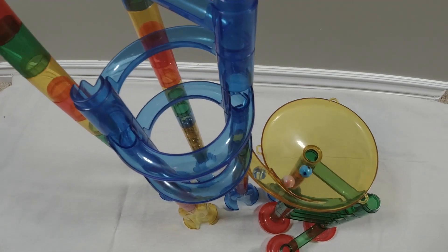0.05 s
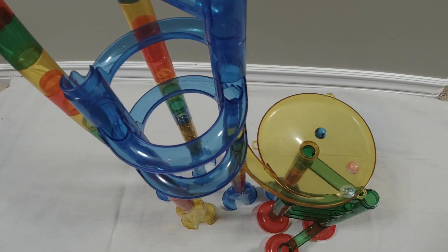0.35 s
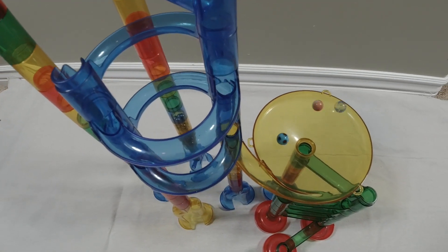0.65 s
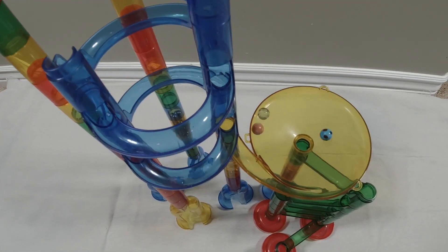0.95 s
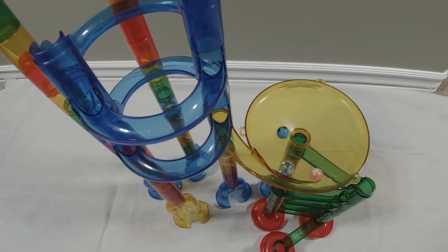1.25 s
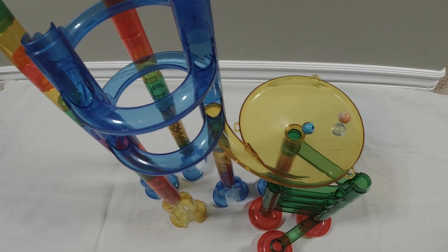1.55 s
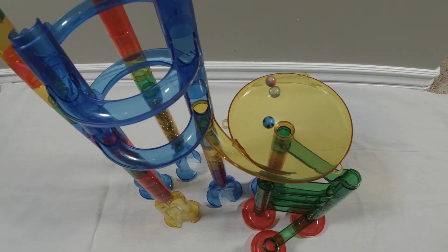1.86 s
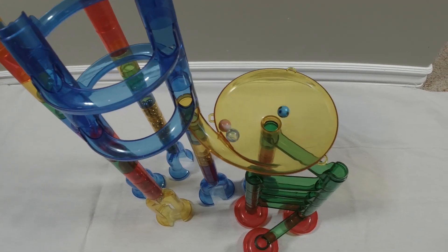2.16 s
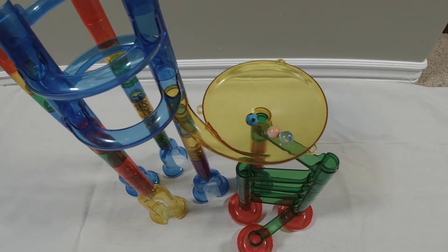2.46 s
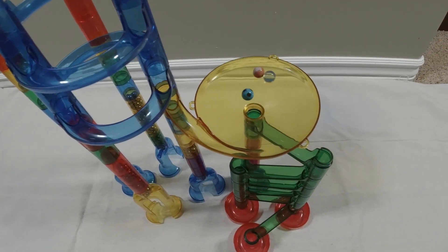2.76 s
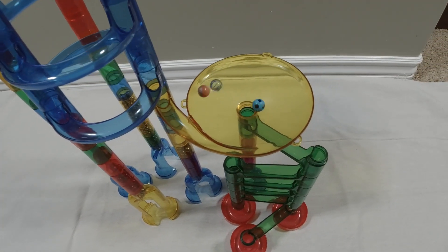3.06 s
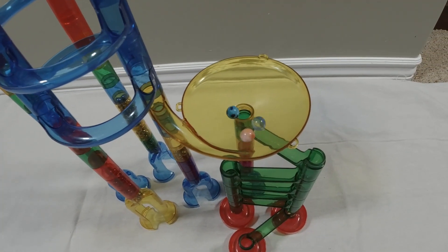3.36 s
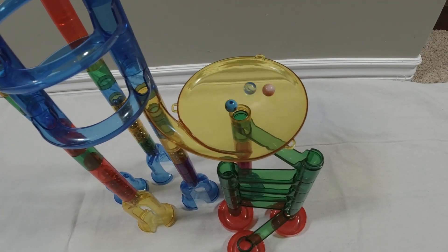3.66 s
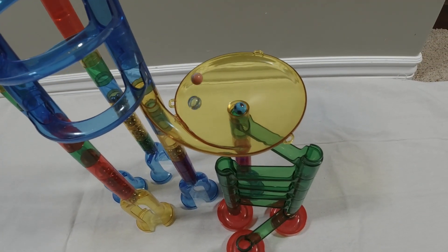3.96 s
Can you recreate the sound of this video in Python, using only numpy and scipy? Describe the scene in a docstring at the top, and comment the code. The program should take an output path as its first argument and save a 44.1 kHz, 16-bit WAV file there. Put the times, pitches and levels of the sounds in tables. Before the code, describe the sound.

Glass marbles roll round a plastic funnel, with light knocks and a clatter at the end.

```python
"""Three glass marbles roll round the plastic funnel dish of a marble run, close by in a small room.
Rolling contact is a stream of tiny impacts that excite the resonances of the dish, its neck and the
thin wall, and shake the tower. Now and then a marble knocks on the plastic, buzzes on the neck's lip
or ticks against another. At the end the innermost marble clatters hard round the throat."""
import sys
import numpy as np
from scipy import signal
from scipy.fft import rfft, irfft
from scipy.io import wavfile
from scipy.ndimage import map_coordinates

SR = 44100
rng = np.random.default_rng(int(sys.argv[2]) if len(sys.argv) > 2 else 0)


def transcribe(signal):
    """Save signal, clipped to [-1, 1], as a 16-bit WAV file at the path in sys.argv[1]."""
    frames = np.atleast_2d(signal).T
    limited = np.clip(frames, -1, 1)
    pcm = np.round(limited * 32767).astype(np.int16)
    wavfile.write(sys.argv[1], SR, pcm)


N = 176400
RESPONSE_SAMPLES = 8192

# resonance spectra of the funnel's dish, neck and throat (frequency [Hz], level [dB])
DISH_SPECTRUM = [(300, -51.5), (450, -29.5), (528, -16.5), (580, -21), (690, -15.5), (790, -1.5),
                 (845, 1.5), (900, -1), (955, 3), (985, -5.5), (1015, 0), (1120, -5), (1185, -2.5),
                 (1270, -13.5), (1450, -1), (1750, -14.5), (2000, -30.5), (3500, -65.5)]
NECK_SPECTRUM = [(700, -37.5), (1250, -14), (1400, -7.5), (1460, 1.5), (1520, -6), (1600, 1.5), (1690, 2.5),
                 (1770, -9), (1880, -24), (2400, -36.5), (4500, -71.5)]
THROAT_SPECTRUM = [(150, -44), (550, -26.5), (1300, -10.5), (1700, 1), (1880, 0.5), (2130, 0.5),
                   (2530, -4.5), (2680, -5.5), (2950, -5), (3300, -11), (3900, -17), (4080, -17.5),
                   (4400, -30), (6500, -51.5)]


def rolling():
    """Roughness excitation: rolling marbles ring each part; harder contact wakes the wall and fine grit."""
    # vibration envelopes (time [s], relative level [dB])
    dish_level = [(0, -34.5), (.15, -40), (.25, -34.5), (.6, -33.5), (.97, -28), (1.2, -31), (1.35, -31.5),
                  (1.42, -39.5), (1.57, -42), (1.8, -34), (1.92, -31), (2.15, -29), (2.33, -35),
                  (2.4, -29.5), (2.6, -50.5), (2.92, -45.5), (3.06, -36.5), (3.11, -29.5), (3.17, -38),
                  (3.27, -30), (3.33, -38), (3.47, -48), (3.64, -38), (3.8, -51), (3.9, -37.5), (4, -32)]
    neck_level = [(0, -34), (.15, -38), (.28, -54), (.42, -38), (.7, -34), (.97, -28.5), (1.18, -40),
                  (1.33, -35), (1.55, -43.5), (1.66, -32), (1.86, -43), (1.95, -29.5), (2.18, -26.5),
                  (2.34, -45), (2.39, -28.5), (2.44, -40), (2.95, -38), (3.1, -41), (3.27, -36.5),
                  (3.44, -38.5), (3.68, -33), (3.8, -34), (4, -35)]
    wall_level = [(0, -47), (.54, -43), (.68, -39.5), (1.06, -41), (1.15, -49), (1.31, -44), (1.55, -49.5),
                  (1.655, -40.5), (1.82, -40.5), (1.94, -33), (2.0, -41.5), (2.12, -39.5), (2.29, -53.5),
                  (2.39, -47.5), (2.52, -49.5), (2.75, -38.5), (3.04, -41.5), (3.11, -45.5), (3.17, -39.5),
                  (3.36, -42), (3.47, -46.5), (3.65, -33.5), (4, -46)]
    tower_level = [(0, -54.5), (.6, -50.5), (.96, -49.5), (1.15, -53), (1.5, -50.5), (2.1, -50),
                   (2.6, -52.5), (3.3, -45.5), (3.5, -50.5), (3.63, -39.5), (3.79, -47.5), (3.95, -38.5)]
    # response spectra (frequency [Hz], level [dB])
    wall_spectrum = [(700, -34), (1750, -0.5), (2160, 2), (2350, -2), (2500, -11), (2680, 2), (2820, 1.5),
                     (3020, -9.5), (3250, -4.5), (3480, -14.5), (3830, -12), (4100, -21.5), (4700, -26),
                     (6500, -56)]
    grit_spectrum = [(2500, -19.5), (4300, 8), (5400, 4.5), (6100, 2), (6800, -7.5), (7600, -1.5),
                     (8600, -9), (10400, -11.5), (12500, -23.5)]
    tower_spectrum = [(30, -11.5), (65, -16), (105, -1), (150, 1), (190, -4.5), (330, -2), (600, -1.5),
                      (800, -3), (1500, -45.5)]
    # gritty scrapes, and the innermost marble's rattles in the throat (start [s], end [s], level [dB])
    scrapes = [(.43, .48, -58), (.91, .98, -54), (1.25, 1.31, -66.5), (1.648, 1.667, -55.5),
               (1.9, 1.95, -55), (2.11, 2.14, -54), (2.38, 2.4, -58), (2.46, 2.9, -72.5),
               (3.01, 3.045, -56.5), (3.59, 3.64, -58.5), (3.86, 4, -59)]
    rattles = [(2.69, 2.77, -34), (2.83, 2.93, -30), (3.54, 3.58, -35.5), (3.595, 3.64, -28),
               (3.68, 3.84, -42), (3.872, 3.9, -23), (3.91, 3.94, -32), (3.96, 4, -22.5)]
    dish = level(dish_level) * roll(DISH_SPECTRUM, per_s=2000, spread_db=4, flutter_db=2, patch_db=-4.5)
    neck = roll(NECK_SPECTRUM, per_s=2000, spread_db=4, flutter_db=2, patch_db=-3.5)
    neck *= amp(-2.5) * level(neck_level)
    wall = roll(wall_spectrum, per_s=550, spread_db=1.5, flutter_db=2.8, patch_db=-2)
    wall = level(wall_level) * drifting(wall)
    grit = roll(grit_spectrum, per_s=1100, spread_db=4.5, flutter_db=5, patch_db=4.5)
    grit *= amp(-32) * level(wall_level) + swells(scrapes, rise_s=0.0065, fall_s=0.016)
    tower = level(tower_level) * roll(tower_spectrum, per_s=900, spread_db=1.5, flutter_db=1.4, patch_db=-6.5)
    rattle = roll(THROAT_SPECTRUM, per_s=1500, spread_db=2.5, flutter_db=1.3, patch_db=-8)
    rattle *= swells(rattles, rise_s=0.013, fall_s=0.017)
    return dish + neck + wall + grit + tower + rattle


def roll(spectrum, per_s, spread_db, flutter_db, patch_db):
    """Shot noise: random bumps of fluttering force drive a resonator, coloured anew by each patch."""
    sizes = amp(spread_db * np.clip(rng.standard_normal(N), -2, 2)) * rng.choice([-1, 1], N)
    bumps = (rng.random(N) < per_s / SR) * sizes * amp(flutter_db * wobble(per_s=60))
    drive = np.pad(bumps, (0, 2 * RESPONSE_SAMPLES))
    dwell = int(0.13 * SR)  # a marble's stay on one patch of plastic
    for i in range(0, N, dwell):
        patch = signal.fftconvolve(bumps[i:i + dwell], tail(t60=0.024))
        drive[i:i + len(patch)] += amp(patch_db) * patch
    return unit(through(drive[:N], ring(spectrum)))


def drifting(x, pitch_share=0.008, per_s=5):
    """Frequency modulation: the wall's resonances slide a little as the marbles move over it."""
    shift = pitch_share * SR / per_s * wobble(per_s)
    return map_coordinates(x, [np.arange(N) + shift], mode="mirror")


def knocks():
    """Impact excitation: marbles knock on the plastic and tick together, and the tower thuds."""
    # blows on the plastic (time [s], relative level at neck [dB], at dish [dB], at throat wall [dB])
    blows = [(.434, -23, -28, -31), (0.448, -17, -19, -32), (0.755, -17.5, -42, -36),
             (.918, -14, -28, -30.5), (0.959, -16, -18, -29.5), (1.038, -21, -25, -36),
             (1.058, -21, -28, -36.5), (1.329, -20, -23, -41), (1.5958, -31, -22, -48),
             (1.633, -30, -22, -38), (1.648, -20.5, -24, -29.5), (1.657, -21, -24.5, -29),
             (1.898, -15, -11, -25.5), (1.915, -18, -9.5, -25), (1.943, -21, -18.5, -26.5),
             (2.118, -17, -13.5, -38), (2.1933, -18.5, -16, -43), (2.735, -20, -28, -27),
             (3.014, -13, -15.5, -20.5), (3.0414, -13, -6, -21.5)]
    # glass on glass (time [s], peak level [dB])
    ticks = [(.936, -43), (.948, -32), (1.932, -40), (2.74, -55)]
    # dull thuds of the tower (start [s], end [s], level [dB])
    thuds = [(.945, .97, -48.5), (2.115, 2.135, -41)]
    # response spectra (frequency [Hz], level [dB])
    glass_spectrum = [(3000, -25.5), (5000, -6.5), (6300, 1.5), (7700, 2.5), (8700, 0.5), (9500, 3),
                      (10400, -2), (11000, -19.5)]
    thud_spectrum = [(60, -20.5), (145, -2), (240, -7.5), (450, -22)]
    times, neck_db, dish_db, wall_db = np.transpose(blows)
    neck = amp(-1) * strike(times, neck_db, NECK_SPECTRUM, buzz_db=-3.5, t60=0.086)
    dish = amp(-1) * strike(times, dish_db, DISH_SPECTRUM, buzz_db=-2.5, t60=0.021)
    wall = amp(11) * strike(times, wall_db, THROAT_SPECTRUM, buzz_db=0.5, t60=0.043)
    glass = strike(*np.transpose(ticks), glass_spectrum, buzz_db=13.5, t60=0.033)
    tower = swells(thuds, rise_s=0.006, fall_s=0.028) * noise(ring(thud_spectrum))
    return neck + dish + wall + glass + tower


def clacks():
    """Hard contact is broadband: the innermost marble rings the throat and two high modes."""
    # clacks in the throat (time [s], peak level [dB])
    blows = [(3.593, -11.5), (3.602, -13), (3.853, -14), (3.858, -10.5), (3.8645, -9.5), (3.8733, -6.5),
             (3.879, -10), (3.892, -10.5), (3.9561, -11), (3.9615, -12), (3.968, -10), (3.9798, -3)]
    # the two high modes (frequency [Hz], level [dB])
    high_modes = [(5000, -21), (5900, 0.5), (6600, -17), (8900, -28.5), (9500, -6), (10100, -28.5)]
    # ringing kept up by the clatter (start [s], end [s], level [dB])
    shimmers = [(3.869, 3.879, -43.5), (3.89, 3.93, -59.5)]
    times, levels_db = np.transpose(blows)
    body = strike(times, levels_db, THROAT_SPECTRUM, buzz_db=-2.5, t60=0.03)
    high = amp(-34.5) * strike(times, levels_db, high_modes, buzz_db=-2, t60=0.049)
    shimmer = roll(high_modes, per_s=500, spread_db=1, flutter_db=4.5, patch_db=-5)
    return body + high + swells(shimmers, rise_s=0.0039, fall_s=0.0066) * shimmer


def strike(times, levels_db, spectrum, buzz_db, t60):
    """Impulse response: each blow rings one part, with a short buzz of the marble against it."""
    out, response = np.zeros(N + RESPONSE_SAMPLES), ring(spectrum)
    response_rms = np.sqrt(np.mean(response ** 2))
    for time, db in zip(times, levels_db):
        buzz = amp(buzz_db) * response_rms * unit(through(tail(t60), response))
        blow = response + buzz
        out[round(time * SR):][:RESPONSE_SAMPLES] += amp(db) * blow / np.abs(blow).max()
    return out[:N]


def buzzes():
    """Contact chatter: a marble buzzes on the neck's lip, which resonates at one pitch."""
    # spells of buzzing (start [s], end [s], level [dB])
    spells = [(2.4, 2.415, -27.5), (2.4435, 2.452, -25), (2.468, 2.476, -27.5), (2.507, 2.518, -28),
              (2.562, 2.572, -25), (2.9645, 3.03, -30), (3.014, 3.019, -17.5), (3.235, 3.32, -33),
              (3.37, 3.39, -31)]
    # the lip's resonance (frequency [Hz], level [dB])
    lip_spectrum = [(1200, -35), (1560, -11), (1680, 0), (1770, -9.5), (2100, -30)]
    lip = roll(lip_spectrum, per_s=1500, spread_db=1.5, flutter_db=1, patch_db=-14)
    return swells(spells, rise_s=0.00092, fall_s=0.004) * lip


def tubes():
    """Forced resonance: the noise of rolling keeps narrow modes of the tubes ringing."""
    # tube tones (start [s], end [s], level [dB], frequency [Hz])
    tones = [(0, 0.797, -51.5, 528), (2.602, 3.5, -48, 788.4), (3.599, 4, -38, 785)]
    t, t60 = np.arange(RESPONSE_SAMPLES) / SR, 0.16
    out = np.zeros(N)
    for start, end, db, hz in tones:
        mode = np.sin(2 * np.pi * hz * t) * amp(-60 * t / t60)
        out += swells([(start, end, db)], rise_s=0.099, fall_s=0.22) * noise(mode)
    return out


def room(toy):
    """Reverberation: diffuse reflections spread the toy in stereo over the faint noise of still air."""
    # spectra of the side signal and of the air (frequency [Hz], relative level [dB])
    side_spectrum = [(30, -5), (90, -33), (300, -23.5), (800, -20.5), (1500, -17), (2800, -12), (5000, -2),
                     (12000, -3)]
    air_spectrum = [(20, -4), (40, -9.5), (100, -19), (400, -19), (3000, -25.5), (12400, -45), (13400, -60)]
    mid = toy + amp(-8.5) * through(toy, tail(t60=0.14))
    side = through(through(toy, tail(t60=0.1)), ring(side_spectrum))
    mid += amp(-61.5) * noise(ring(air_spectrum))
    side += amp(-66.5) * noise(ring(air_spectrum))
    return np.array([mid + side, mid - side])


def amp(db):
    """Decibels to amplitude ratio."""
    return 10 ** (np.asarray(db) / 20)


def unit(x):
    """Normalisation to rms 1."""
    return x / np.sqrt(np.mean(x ** 2) + 1e-20)


def level(rows):
    """Gain envelope through (time [s], level [dB]) points."""
    return amp(np.interp(np.arange(N) / SR, *np.transpose(rows)))


def swells(rows, rise_s, fall_s):
    """Exponential rise, hold and decay for each (start [s], end [s], level [dB]) row."""
    t = np.arange(N) / SR
    return sum(amp(db) * np.exp(np.minimum(t - start, 0) / rise_s - np.maximum(t - end, 0) / fall_s)
               for start, end, db in rows)


def wobble(per_s):
    """Smooth random modulation with per_s knots a second."""
    return map_coordinates(rng.standard_normal(8192), [np.arange(N) * per_s / SR], mode="wrap")


def ring(spectrum, skirt_db_per_octave=18):
    """Minimum-phase impulse response of a spectrum that rolls off above its last point."""
    points_hz, db = np.transpose(spectrum)
    hz = np.fft.rfftfreq(RESPONSE_SAMPLES, 1 / SR) + 1
    skirt_db = skirt_db_per_octave * np.maximum(np.log2(hz / points_hz[-1]), 0)
    magnitude = amp(np.interp(np.log(hz), np.log(points_hz), db) - skirt_db)
    cepstrum = irfft(np.log(magnitude))
    cepstrum[1:RESPONSE_SAMPLES // 2] *= 2  # folding makes the response causal
    cepstrum[RESPONSE_SAMPLES // 2 + 1:] = 0
    return irfft(np.exp(rfft(cepstrum)))


def through(x, response):
    """Convolution with an impulse response."""
    return signal.fftconvolve(x, response)[:len(x)]


def noise(response):
    """White noise filtered by an impulse response, rms 1."""
    return unit(through(rng.standard_normal(N), response))


def tail(t60):
    """Diffuse decay: noise of energy 1 that falls 60 dB in t60 seconds."""
    x = rng.standard_normal(RESPONSE_SAMPLES) * amp(-60 * np.arange(RESPONSE_SAMPLES) / SR / t60)
    return x / np.linalg.norm(x)


def scene():
    """Superposition: all the toy's sounds add in the room."""
    return room(rolling() + knocks() + clacks() + buzzes() + tubes())


def record(dry, cutoff_hz=14800):
    """Band limiting: a steep low-pass removes the highest treble."""
    return signal.sosfilt(signal.ellip(10, 0.1, 80, cutoff_hz, fs=SR, output="sos"), dry)


dry = scene()
out = record(dry)
transcribe(out)
```